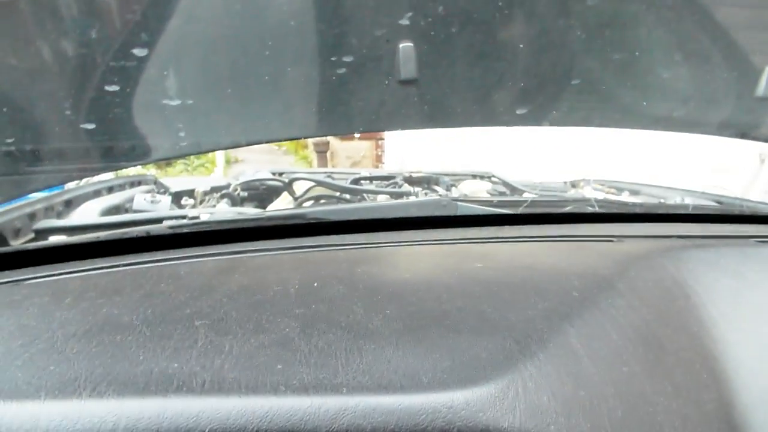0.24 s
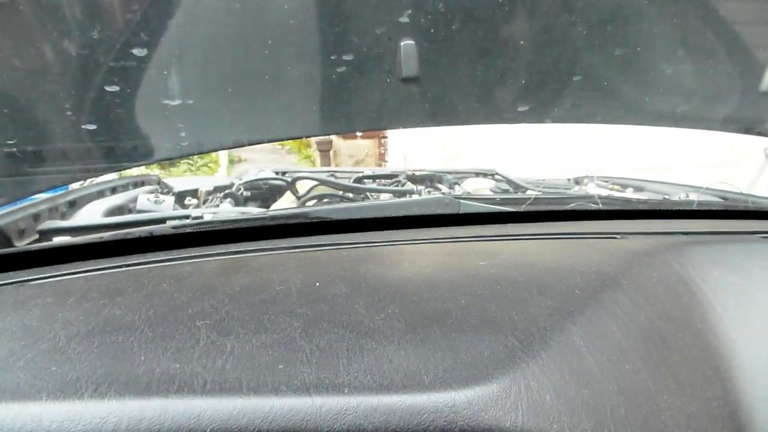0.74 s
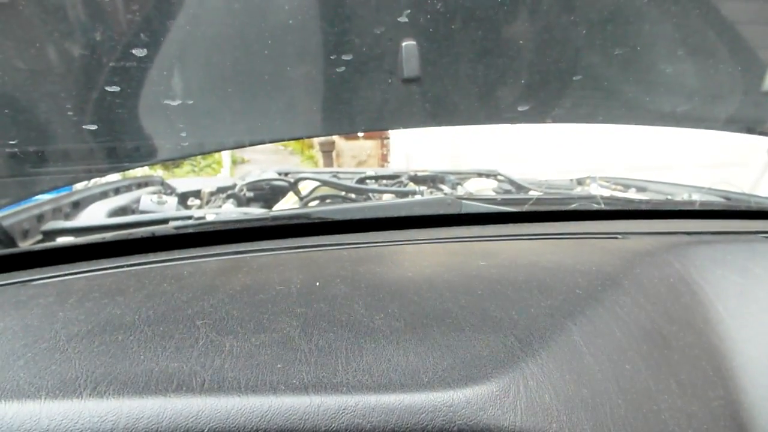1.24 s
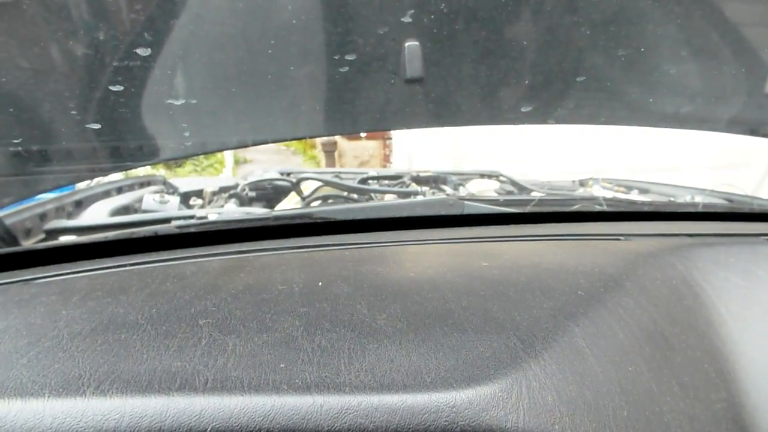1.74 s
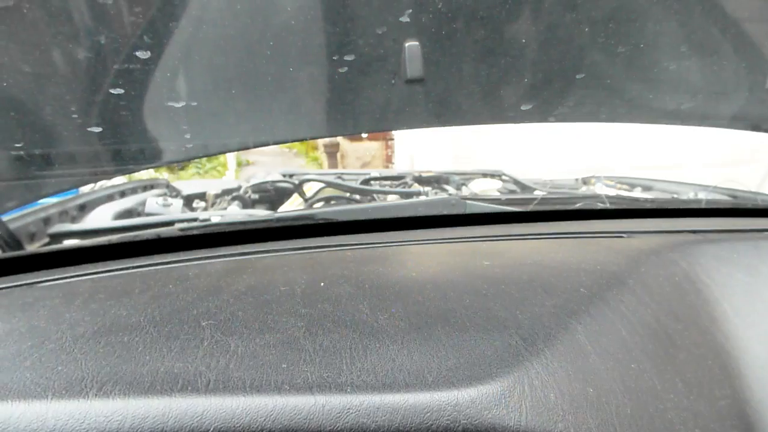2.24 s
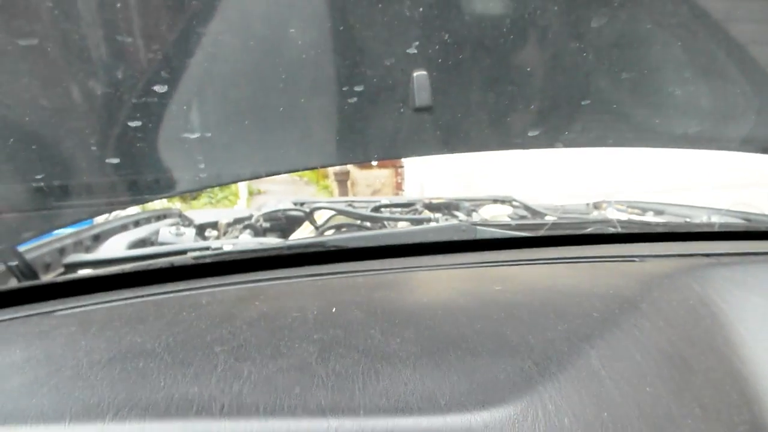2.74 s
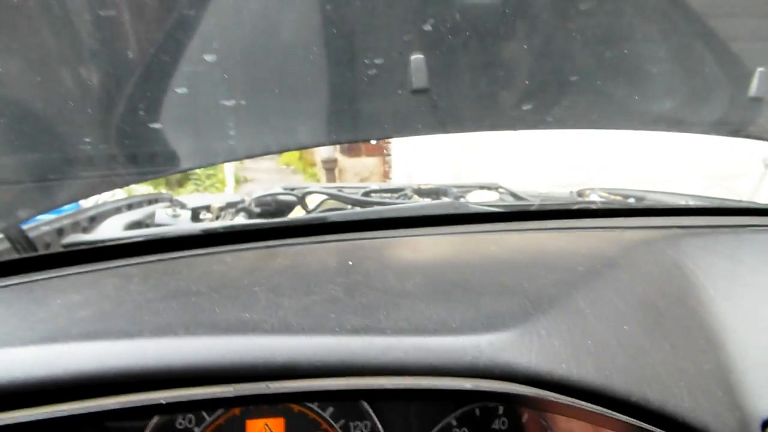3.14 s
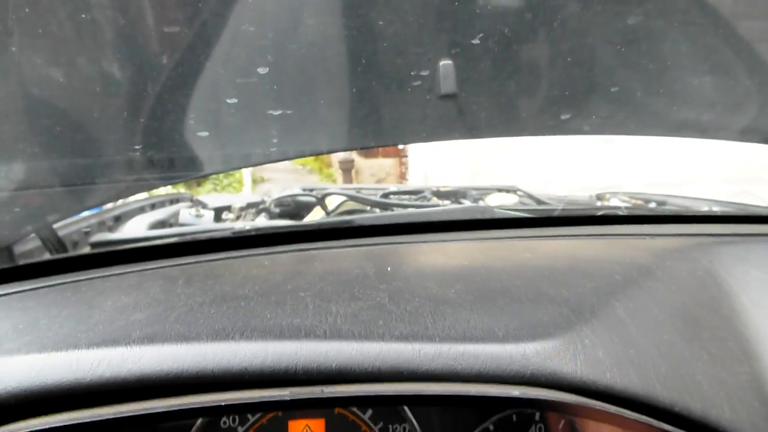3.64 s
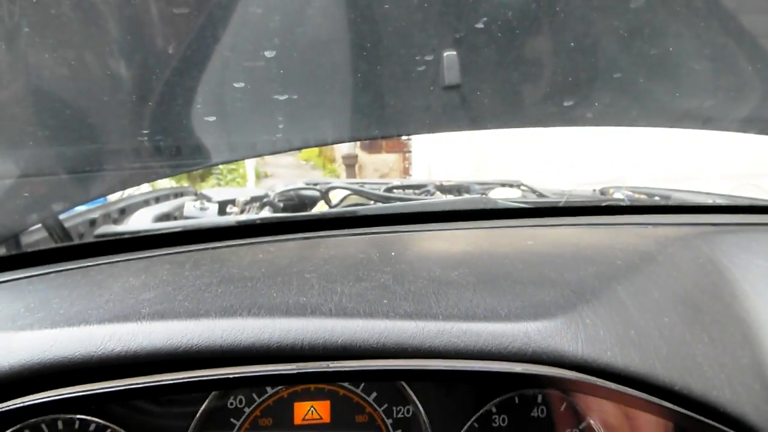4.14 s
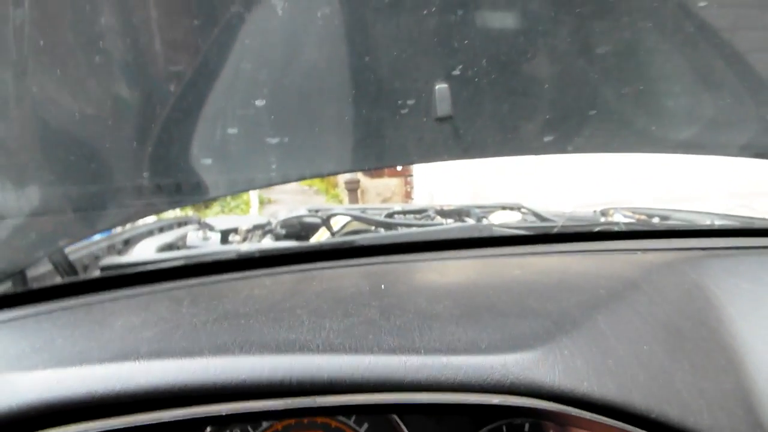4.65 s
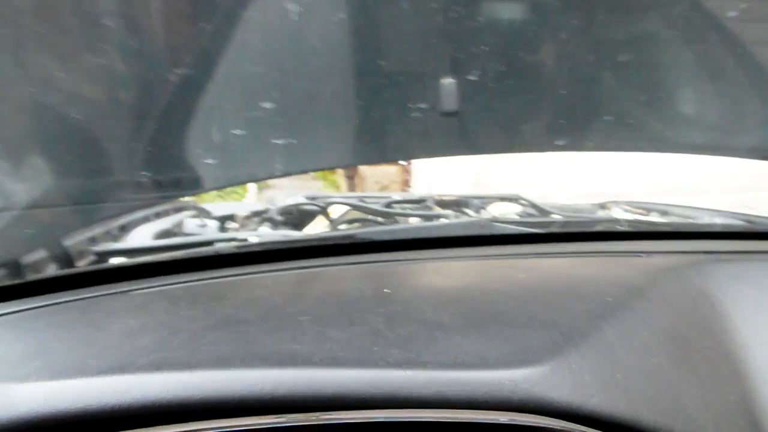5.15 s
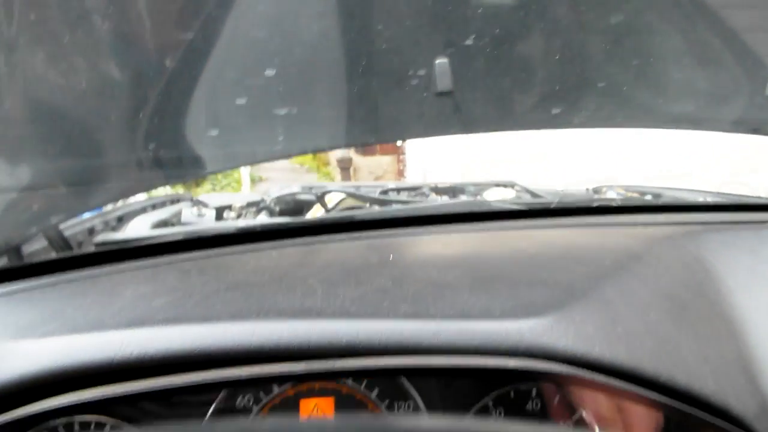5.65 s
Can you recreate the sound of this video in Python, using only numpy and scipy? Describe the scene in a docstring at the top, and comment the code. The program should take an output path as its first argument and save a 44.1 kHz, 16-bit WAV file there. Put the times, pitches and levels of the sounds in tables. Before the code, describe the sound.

Inside a car cabin, a whining starter pulses quickly over grinding metal and low booming, a loose part rattling regularly, the engine never firing.

```python
"""Engine cranking without catching

A starter motor turns an eight-cylinder engine that will not catch, heard from the driver's seat.
Each compression slows the pinion (the small driving gear) and loads its teeth: sine tones swell and sag.
Filtered noise makes the grinding metal, the humming panels and the motor's whirr.
A loose part rattles once a turn as taps set off resonances; low sines make the cabin boom.
Brief tones squeal now and then, and one dull thud comes near the end."""
import sys
import numpy as np
from scipy import signal
from scipy.fft import rfft, irfft
from scipy.io import wavfile
from scipy.ndimage import uniform_filter1d

SR = 44100
rng = np.random.default_rng(int(sys.argv[2]) if len(sys.argv) > 2 else 0)


def int16_out(signal):
    """Quantize to a 16-bit WAV file."""
    q = np.round(np.clip(np.atleast_2d(signal).T, -1, 1) * 32767)
    wavfile.write(sys.argv[1], SR, q.astype(np.int16))


def decibels_to_gain(level_db):
    """Convert a level in decibels to a linear amplitude gain (20 dB per decade)."""
    exponent = np.asarray(level_db, float) / 20
    return 10 ** exponent


N = 259308
T = np.arange(N) / SR  # time of each sample in seconds

# rattles of the loose part: (time [s], level [dB], knock pitch [Hz],
# panel ring relative to the rattle [dB], relative thump strength [dB])
RATTLE_EVENTS = [(.321, -20.5, 584, -22, -6), (.771, -20, 535, -29, -1.5), (1.219, -25, 577, -32, 3),
                 (1.66, -21.5, 509, -14, 1), (2.139, -18.5, 587, -31, -2.5), (2.587, -19, 527, -6.5, 0),
                 (3.066, -23.5, 583, -26, 0), (3.514, -20, 532, -4.5, -1), (3.992, -20, 577, -22, 0.5),
                 (4.436, -22, 532, -11, 3.5), (4.906, -21, 590, -11, -2.5), (5.358, -20, 527, -2.5, 3),
                 (5.825, -21, 580, -5, 1.5)]
# resonances of the metal housing: (centre [Hz], width [Hz], level for noise [dB])
HOUSING_MODES = [(310.8, 14.2, -12), (958, 6.7, -13.5), (1040.3, 23.4, -11.5), (1210, 84, -12),
                 (1337, 23, -14.5), (1458, 41, -13.5), (1890, 27, -19), (2000, 15, -18.5), (2178, 32, -27),
                 (2486, 12, -20.5), (2762, 39, -22), (3026, 27, -19.5), (3335, 40, -19.5), (3515, 42, -23),
                 (4430, 22, -26), (5370, 110, -21), (5730, 54, -25.5), (6840, 310, -26.5), (9930, 480, -24)]


def colour(x, points):
    """Shape a sound's spectrum by (frequency [Hz], gain [dB]) points."""
    hz, db = np.transpose(points)
    f = np.maximum(np.fft.rfftfreq(N, 1 / SR), 1)
    gain = decibels_to_gain(np.interp(np.log(f), np.log(hz), db))
    return irfft(rfft(x) * gain, N)


def ring(x, hz, width):
    """One resonance, with gain 1 at its centre."""
    return signal.lfilter(*signal.iirpeak(hz, hz / width, SR), x)


def walk(rate):
    """Random levels, each held 1 / rate seconds, then smoothed twice; their spread is near 1."""
    hold = int(SR / rate)
    steps = np.repeat(rng.standard_normal(N // hold + 1), hold)
    return 1.36 * uniform_filter1d(uniform_filter1d(steps, hold), hold)[:N]


def rings(x, modes):
    """Noise through a table of resonances, each swelling on its own."""
    total = 0
    for hz, width, db in modes:
        swelling = x * decibels_to_gain(2.87 * walk(12))
        # a narrow resonance passes less noise, so make up for its width
        total = total + ring(swelling, hz, width) * decibels_to_gain(db) * np.sqrt(SR / 2 / width)
    return total


def crank(early_s, late_s, dwell_s):
    """The pinion slows up each compression, dwells, then springs back; tone levels follow the cycle."""
    # eight compressions that repeat: (place in cycle [0-8], base tooth rate [Hz], sag [Hz per s],
    # then base levels of hum, third overtone, fourth overtone and grind [dB])
    cylinders = [(1.06, 314, 340, -28, -30, -33.5, -36.5), (1.95, 318.5, 640, -28, -33.5, -33.5, -36),
                 (3.01, 328, 520, -28.5, -32.5, -35, -35.5), (3.9, 333, 560, -28.5, -36, -38.5, -34.5),
                 (4.97, 318, 640, -26, -32.5, -36, -36.5), (5.95, 340, 400, -29.5, -34, -40, -35.3),
                 (6.91, 322, 635, -24, -32, -33, -33.5), (7.88, 312, 347, -29, -35.5, -34, -36)]
    # slow changes added to the cycle: (time [s], tooth rate shift [Hz],
    # then changes of hum, third overtone, fourth overtone and boom [dB])
    slow = [(0, -8, -15, 2, -2.5, 7), (.12, 0, -1, -7, -1, -3), (.45, 6, -3, 0, 2, 0.5),
            (.9, 7, -0.5, 1.5, -3, -1.5), (1.351, 8, -3, 2, 0.5, -1.5), (1.8, 0, 0, -3.5, -1, -1),
            (2.3, -2, -1, 1.5, 2.5, -1), (2.8, -1, 1, -1.5, -1.5, 0), (3.3, -3, -0.5, 0, -0.5, -2),
            (3.8, -3, 1.5, -1.5, -2, 0), (4.299, -1, -2, -0.5, -3.5, -0.5), (4.8, 2, 2, 0.5, -0.5, 0.5),
            (5.3, -1, 0, 1.5, 3, 0), (5.88, 5, 1, 1.5, -3, -2.5)]

    # a rattle marks every fourth compression; add one mark before and one after
    marks = np.array([event[0] for event in RATTLE_EVENTS])
    marks = np.r_[2 * marks[0] - marks[1], marks, 2 * marks[-1] - marks[-2]]
    mark_place = 4 * np.arange(len(marks))
    place = np.interp(T, marks, mark_place)

    rows = np.tile(cylinders, (len(marks) // 2, 1))
    at, hz, sag, *levels = rows.T
    cycle = np.arange(len(at)) // 8
    s = np.interp(at + 8 * cycle, mark_place, marks)  # time of each compression
    slow_s, shift_hz, *slow_db, boom_db = np.transpose(slow)
    hz = hz + np.interp(s, slow_s, shift_hz)
    stroke = np.interp(T, s, np.arange(len(s)))

    # three corners per compression: start of the slowing, end of it, end of the dwell
    knots = np.ravel([s - early_s, s + late_s, s + late_s + dwell_s], order="F")
    slowest = hz - sag * late_s
    corner_hz = np.ravel([hz + sag * early_s, slowest, slowest], order="F")
    rate = uniform_filter1d(np.interp(T, knots, corner_hz), SR // 50)

    # random level changes [dB]: small for the hum, larger for the two overtones
    scatter = rng.standard_normal((len(s), 3)).T * [[0.45], [1.5], [1.5]]
    tone_db = []
    for db, change, slow_change in zip(levels, scatter, slow_db):
        tone_db.append(np.interp(T, s, db + change) + np.interp(T, slow_s, slow_change))
    grind_db = np.interp(T, s, levels[-1])
    return place, stroke, rate, tone_db, grind_db, np.interp(T, slow_s, boom_db)


def load(stroke, lead, depth_db, flat=0.98):
    """Gain that peaks with each compression and falls by depth_db between; flat widens the top."""
    unloaded = (1 - np.cos(2 * np.pi * (stroke + lead))) / 2
    return decibels_to_gain(-depth_db * unloaded ** flat)


def gears(stroke, rate, hum_db, third_db, fourth_db, wobble, shaky):
    """Meshing teeth hum with overtones, which the housing lifts; the pinion runs out of true once a turn."""
    # weaker overtones: (multiple of tooth rate, relative level [dB])
    weak_orders = [(2, -7), (5, -14), (6, -11), (7, -15), (8, -10.5), (9, -11), (10, -19), (11, -19.5),
                   (12, -14), (14, -40), (16, -19), (17, -18)]
    pinion_teeth = 8

    teeth = 2 * np.pi * np.cumsum(rate) / SR  # phase, one cycle per tooth
    runout = 1 + wobble * np.sin(teeth / pinion_teeth)
    hum = np.sin(teeth + 0.18 * walk(40)) * decibels_to_gain(hum_db) * load(stroke, -0.029, 16.9, flat=1.77)
    third = np.sin(3 * teeth + shaky * walk(60)) * decibels_to_gain(third_db) * load(stroke, 0.12, 14.2, flat=2.1)
    fourth = np.sin(4 * teeth + shaky * walk(71)) * decibels_to_gain(fourth_db) * load(stroke, 0.017, 12.6, flat=1.43)
    weak = 0
    for order, db in weak_orders:
        level = decibels_to_gain(db - 35 + 3.5 * walk(25.13))
        weak = weak + level * np.sin(order * (teeth + 0.053 * walk(60)))
    tone = hum + runout * (third + fourth + weak * load(stroke, 0.086, 6.3))
    lifted = sum(ring(tone, hz, width) for hz, width, _ in HOUSING_MODES)
    return 0.95 * tone + 0.74 * lifted, teeth


def grind(stroke, teeth, grind_db, bite):
    """Rubbing metal is noise puffed once a tooth, broad and through the housing; panels hum nearly steadily."""
    # colour of the broad rubbing noise: (frequency [Hz], relative gain [dB])
    grind_colour = [(60, -45), (120, -24), (250, -23), (400, -17), (800, -16.5), (1300, -16), (1730, -35),
                    (3000, -17.5), (4800, -21), (10000, -30), (14500, -31), (15100, -60)]
    # resonances of panels and housings: (centre [Hz], width [Hz], relative level [dB])
    panel_modes = [(76.8, 17, -20.5), (186.1, 17.4, -13.5), (245, 40, -16.5), (520.7, 25, -16),
                   (587, 24, -15.5), (734, 21, -14.5), (811, 17, -10.5)]

    puffs = 1 + bite * np.sin(teeth)
    rub = rng.standard_normal(N) * puffs * decibels_to_gain(grind_db + walk(150))
    broad = colour(rub * load(stroke, 0.022, 3.6), grind_colour) * decibels_to_gain(20)
    housing = rings(rub * load(stroke, 0.0095, 7.6), HOUSING_MODES) * decibels_to_gain(3.5)
    panel_noise = rng.standard_normal(N) * load(stroke, 0.12, 0.4)
    return broad + housing + rings(panel_noise, panel_modes) * decibels_to_gain(-33.5)


def whirr():
    """Brushes and air of the motor: coloured noise whose level is nearly steady."""
    # colour of the whirr: (frequency [Hz], relative gain [dB])
    whirr_colour = [(50, -35), (120, -19.5), (400, -23.5), (1000, -26), (3000, -19.5), (6000, -28),
                    (10000, -25), (14500, -29.5), (15100, -50)]
    unsteady = decibels_to_gain(0.5 * walk(6.08) + 1.47 * walk(30))
    return colour(rng.standard_normal(N), whirr_colour) * decibels_to_gain(-12) * unsteady


def drift(x, low_hz, mid_hz):
    """Two bands of the grind and whirr slowly rise and sink."""
    # slow path of the two bands: (time [s], low band gain [dB], middle band gain [dB])
    drift_path = [(0, 1, 1), (1, 3.5, 2), (2, 3, 0.5), (3, 0, -2.5), (4, 2, -3.5), (5, 5, 1),
                  (5.88, 4.5, -0.5)]
    s, low_db, mid_db = np.transpose(drift_path)
    low_change = ring(x, low_hz, 61) * (decibels_to_gain(np.interp(T, s, low_db)) - 1)
    mid_change = ring(x, mid_hz, 310) * (decibels_to_gain(np.interp(T, s, mid_db)) - 1)
    return x + low_change + mid_change


def boom(place, stroke, boom_db):
    """The shaking engine drives the cabin's low air mode, with sines at 3 and 4 times the compression rate."""
    # cabin boom over one cycle, swelling after compressions:
    # (place in cycle [0-8], relative level [dB], pitch [Hz])
    boom_cycle = [(.5, -29.5, 38.5), (1.0, -34, 45), (1.35, -34, 46), (2.05, -41.5, 40), (2.5, -39.5, 39),
                  (2.95, -52, 37), (3.5, -28.5, 40), (3.85, -32.5, 40.5), (4.2, -34, 52), (4.8, -58, 42),
                  (5.3, -31, 38.5), (6.1, -35, 30), (6.45, -29.5, 37), (6.85, -36, 40), (7.25, -32.5, 41),
                  (7.8, -43, 42)]
    at, db, hz = np.transpose(boom_cycle)
    level = np.interp(place, at, decibels_to_gain(db), period=8) * decibels_to_gain(boom_db)
    hz = np.interp(place, at, hz, period=8)
    mode = np.sqrt(2) * np.sin(2 * np.pi * np.cumsum(hz) / SR)
    third = np.sin(2 * np.pi * 3 * stroke)
    fourth = np.sin(2 * np.pi * 4 * stroke)
    return level * (mode + 0.19 * fourth + 0.41 * third) + decibels_to_gain(-44.5) * third


def rattles(panel_hz, thump_hz):
    """A quick chatter of taps sets off a pitched knock, fixed modes and a low thump; a panel rings on."""
    # resonances shared by all rattles: (centre [Hz], width [Hz], relative level [dB])
    knock_modes = [(475, 49, 1.5), (1156, 105, -4), (1450.2, 235, -8)]
    # taps within one rattle: (time from the rattle's mark [s], relative level [dB])
    tap_pattern = [(-.022, -12.5), (-.011, 1), (0, 5.5), (.012, -5), (.022, -1.5)]

    out, n = np.zeros(N + SR), SR // 4
    t = np.arange(n) / SR
    first_s = tap_pattern[0][0]
    slips = rng.standard_normal((len(RATTLE_EVENTS), len(tap_pattern)))
    for (s, db, hz, panel_db, thump_db), slip in zip(RATTLE_EVENTS, slips):
        taps = np.zeros(n)
        for (late, tap_db), d in zip(tap_pattern, slip):
            # each tap comes late by a random amount, about a millisecond
            taps[int((late - first_s + 0.001 * abs(d)) * SR)] = decibels_to_gain(tap_db)
        modes = knock_modes + [(hz, 40, 4)]
        knock = sum(ring(ring(taps, f, w), f, 3 * w) * decibels_to_gain(33 + g) for f, w, g in modes)
        # the low thump follows the chatter a moment later
        thump = ring(ring(taps, thump_hz, 30.6), thump_hz, 94)
        thump = np.roll(thump, int(0.00798 * SR)) * decibels_to_gain(42 + thump_db)
        swell = (1 - np.exp(-t / 0.033)) * np.exp(-t / 0.1)
        panel = decibels_to_gain(panel_db) * np.sin(2 * np.pi * panel_hz * t) * swell
        i = int((s + first_s) * SR)
        out[i:i + n] += decibels_to_gain(db) * (knock + thump + panel)
    return out[:N]


def squeals(length_s):
    """A resonance sings out for a moment: a sine that swells and fades."""
    # brief tonal flares: (time of peak [s], peak level [dB], pitch [Hz])
    flares = [(2.8, -30.5, 2000), (3.724, -31.5, 2000), (4.47, -24, 825)]
    total = 0
    for s, db, hz in flares:
        swell = np.exp(-((T - s) / length_s) ** 2)
        total = total + decibels_to_gain(db) * np.sin(2 * np.pi * hz * T) * swell
    return total


def thuds():
    """A soft dull blow through the body: a dying sine with a higher partial that lasts slightly longer."""
    # blows: (time [s], level of the lower partial before its decay [dB], pitch [Hz])
    blows = [(5.698, -26.5, 129)]
    total = 0
    for s, db, hz in blows:
        t = np.maximum(T - s, 0)
        low = np.sin(2 * np.pi * hz * t) * np.exp(-t / 0.024)
        high = 0.75 * np.sin(2 * np.pi * 2.1 * hz * t) * np.exp(-t / 0.027)
        total = total + decibels_to_gain(db) * (low + high)
    return total


def scene():
    """All sounds reach two microphone ports; the treble comes from the left and is partly diffuse."""
    # share of diffuse sound, which differs between the ports: (frequency [Hz], gain [dB])
    diffuse_share = [(60, -16), (400, -17.5), (1200, -13.5), (2300, -9), (4200, -6), (8000, -5.5),
                     (14000, -5)]

    place, stroke, rate, tone_db, grind_db, boom_db = crank(early_s=0.045, late_s=0.022, dwell_s=0.018)
    tone, teeth = gears(stroke, rate, *tone_db, wobble=0.12, shaky=0.06)
    # two separate noises: one heard alike at both ports, one diffuse
    direct, diffuse = (drift(grind(stroke, teeth, grind_db, bite=0.34) + whirr(), low_hz=94.5, mid_hz=1530)
                       for _ in range(2))
    mid = tone + direct + boom(place, stroke, boom_db)
    mid = mid + rattles(panel_hz=820, thump_hz=284) + squeals(length_s=0.017) + thuds()
    echo = decibels_to_gain(-24) * np.roll(mid, SR // 190)  # one close echo reaches the ports unequally
    side = colour(diffuse, diffuse_share) + echo

    f = np.fft.rfftfreq(N, 1 / SR)
    lead = 2.35 * (f / 14000) ** 1.74  # radians by which the left port leads
    dip_db = 3 * np.exp(-((f - 8000) / 2000) ** 2)
    rise_db = 3.8 / (1 + (11000 / (f + 1)) ** 8)
    tilt_db = 0.4 - dip_db + rise_db  # left level over right
    half = decibels_to_gain(tilt_db / 2) * np.exp(0.5j * lead)  # each port takes half the difference
    left = irfft(rfft(mid + side) * half, N)
    right = irfft(rfft(mid - side) / half, N)
    return np.array([left, right])


def roll_off(x):
    """The treble ends steeply here."""
    return signal.sosfilt(signal.butter(12, 14940, fs=SR, output="sos"), x)


def record(dry):
    """Take the finished two-port mix to its final sound."""
    return roll_off(dry)


dry = scene()
out = record(dry)
int16_out(out)
```